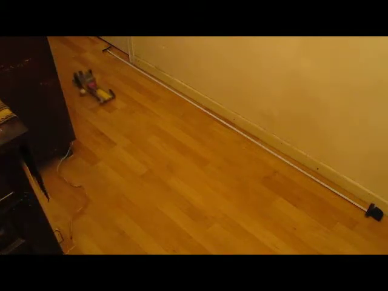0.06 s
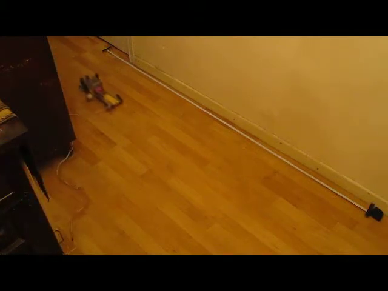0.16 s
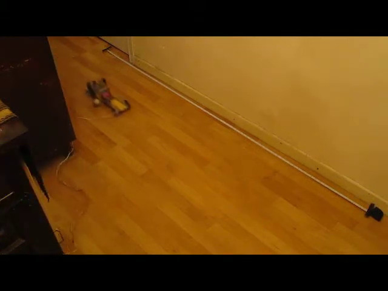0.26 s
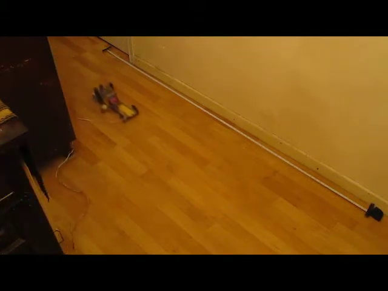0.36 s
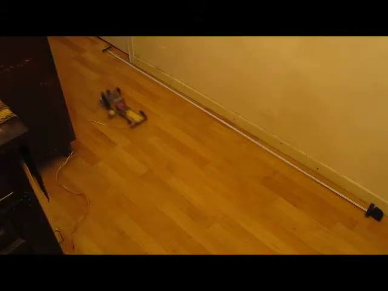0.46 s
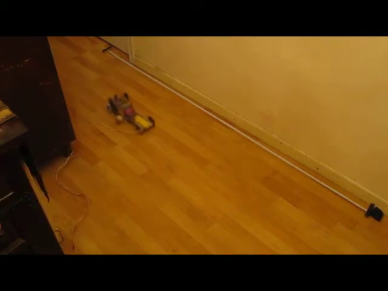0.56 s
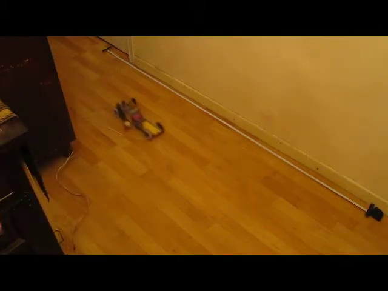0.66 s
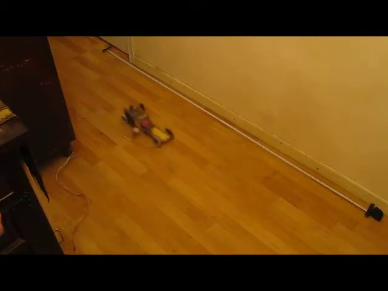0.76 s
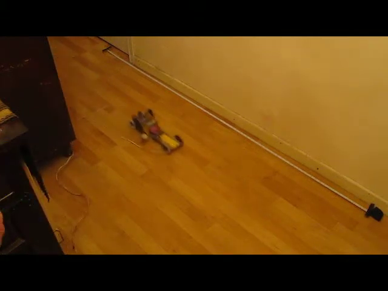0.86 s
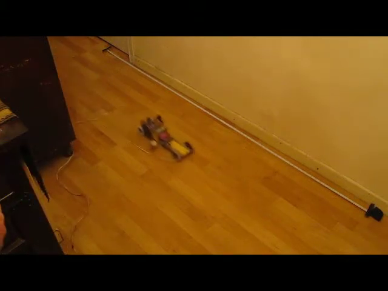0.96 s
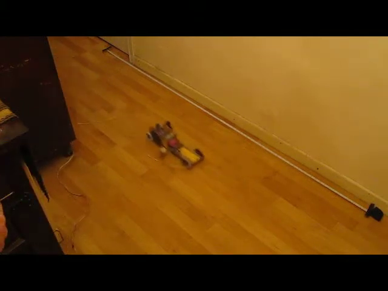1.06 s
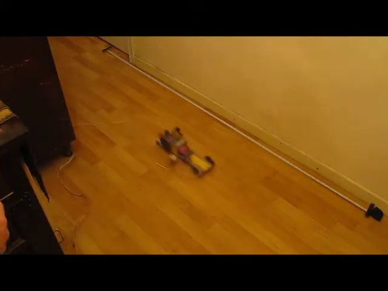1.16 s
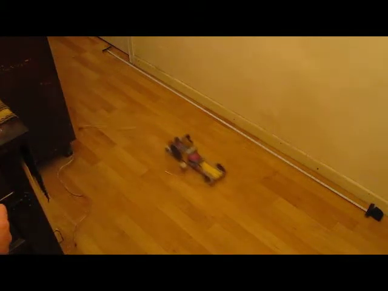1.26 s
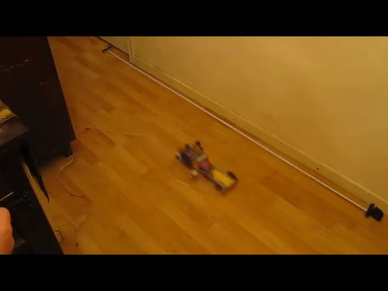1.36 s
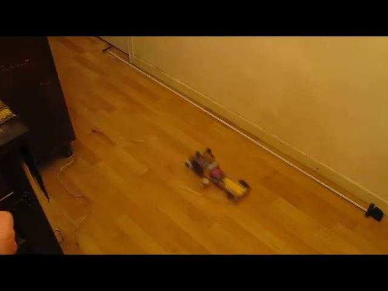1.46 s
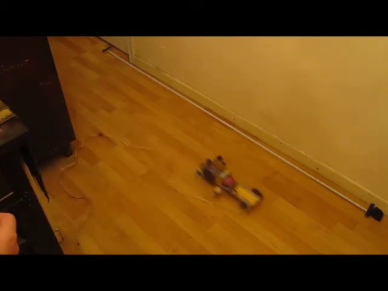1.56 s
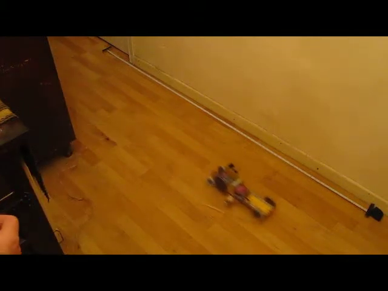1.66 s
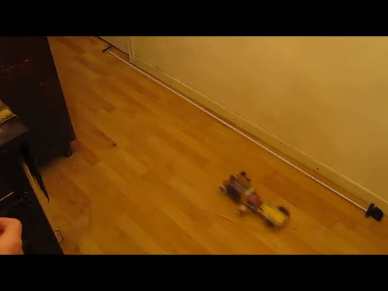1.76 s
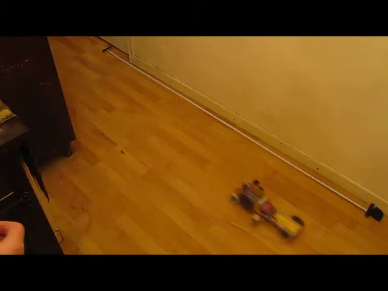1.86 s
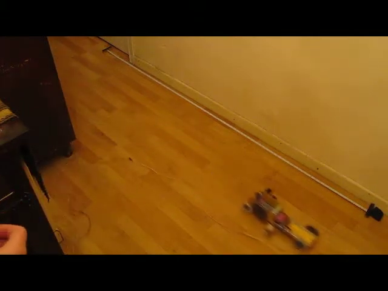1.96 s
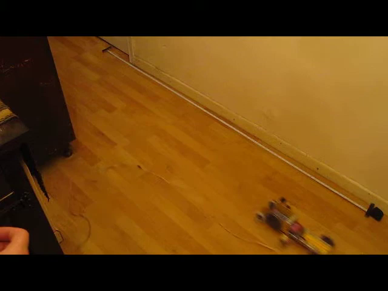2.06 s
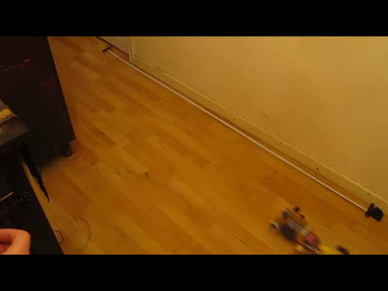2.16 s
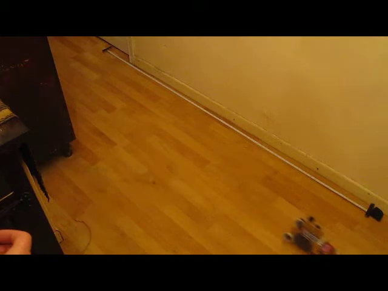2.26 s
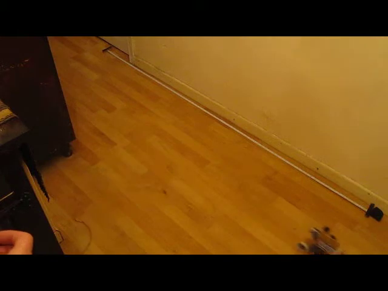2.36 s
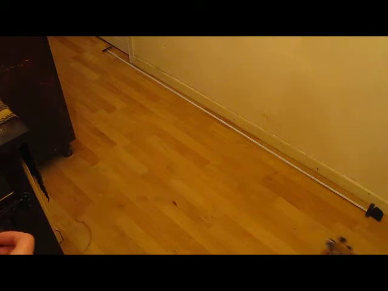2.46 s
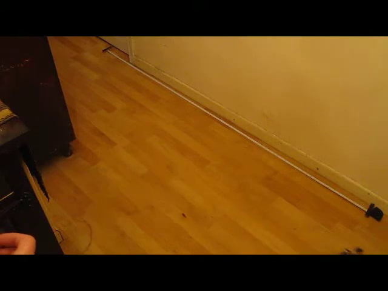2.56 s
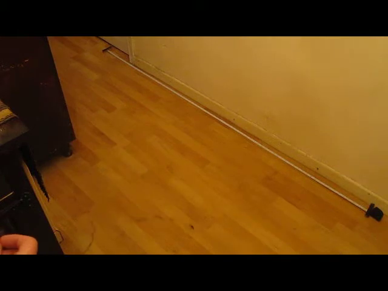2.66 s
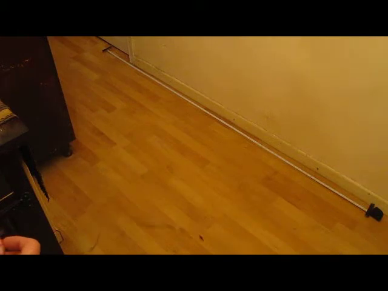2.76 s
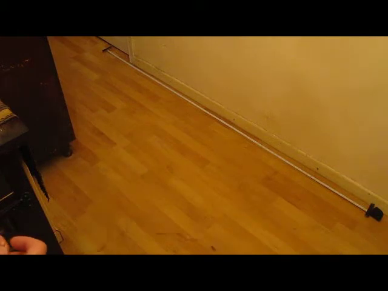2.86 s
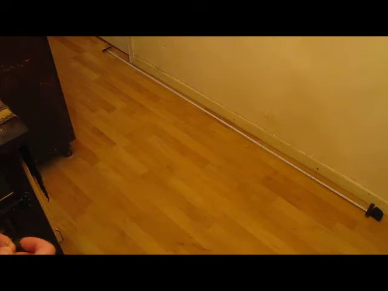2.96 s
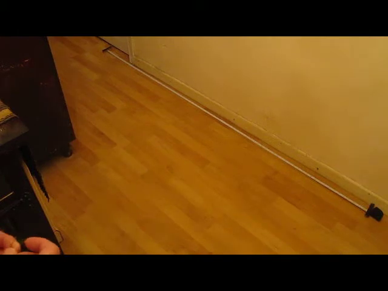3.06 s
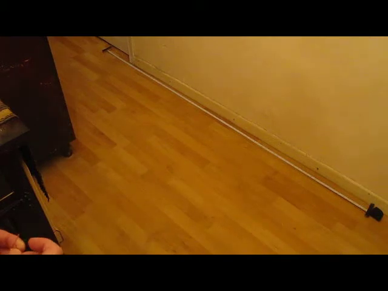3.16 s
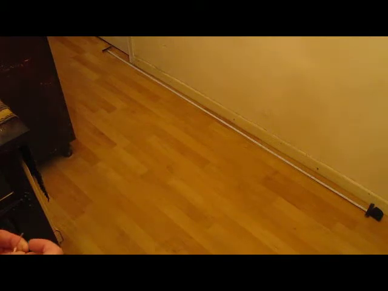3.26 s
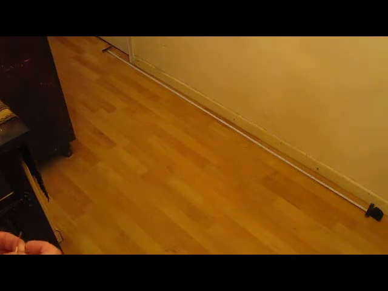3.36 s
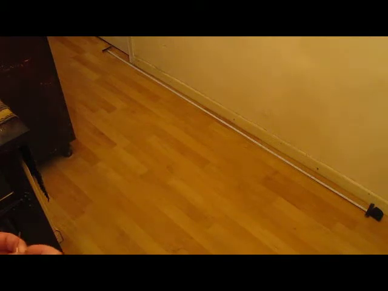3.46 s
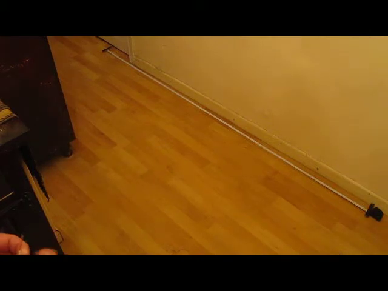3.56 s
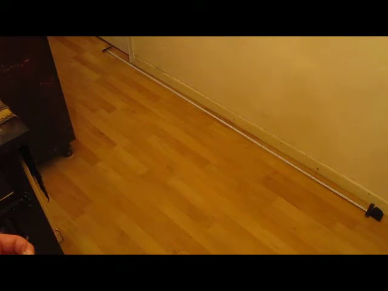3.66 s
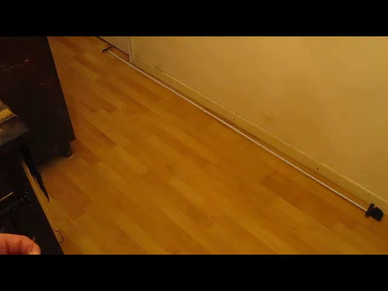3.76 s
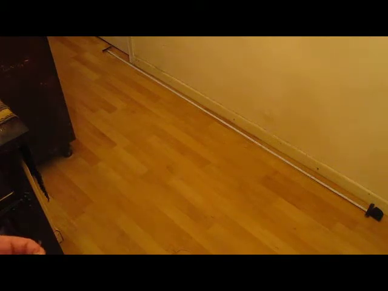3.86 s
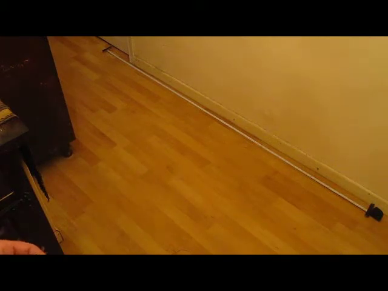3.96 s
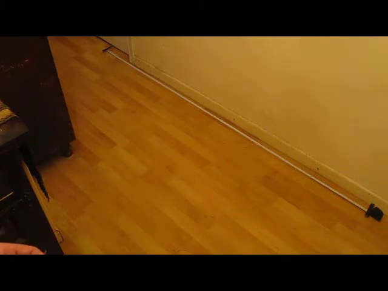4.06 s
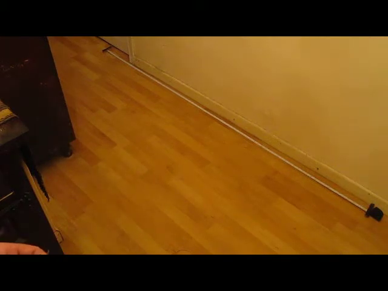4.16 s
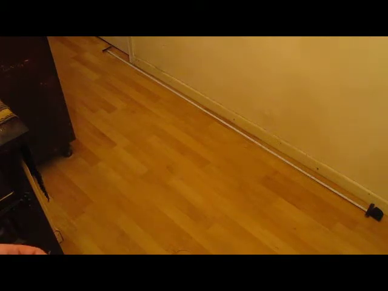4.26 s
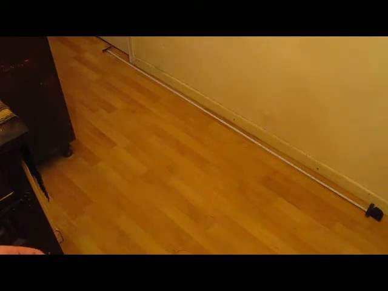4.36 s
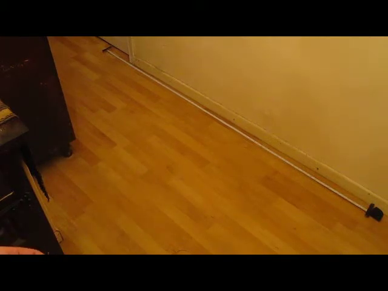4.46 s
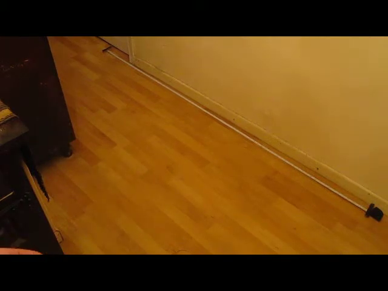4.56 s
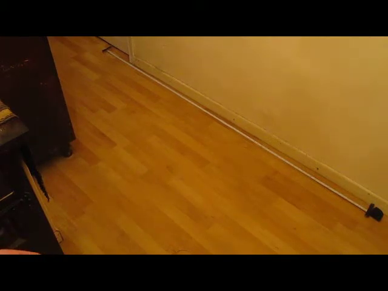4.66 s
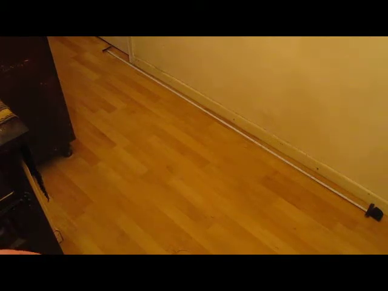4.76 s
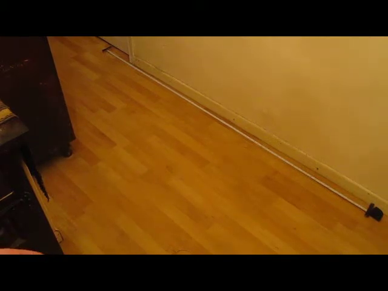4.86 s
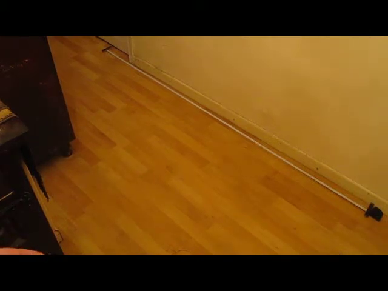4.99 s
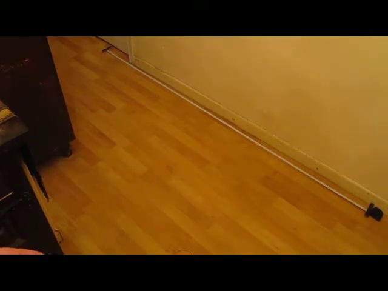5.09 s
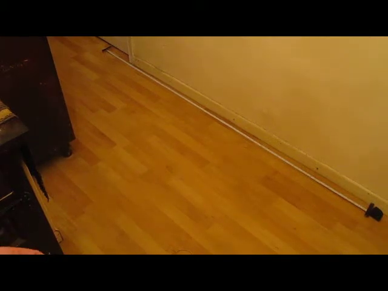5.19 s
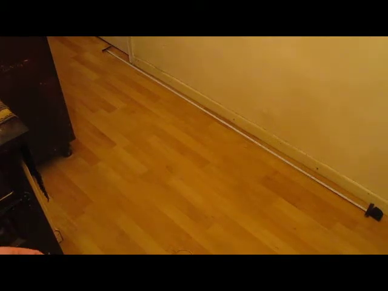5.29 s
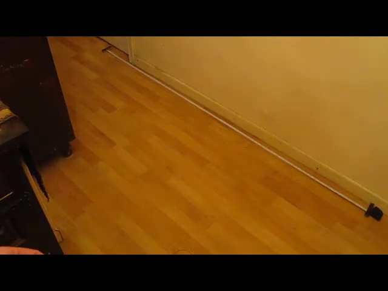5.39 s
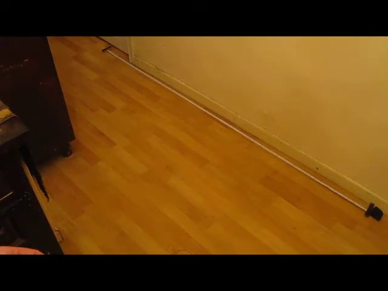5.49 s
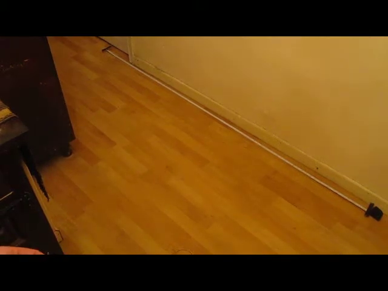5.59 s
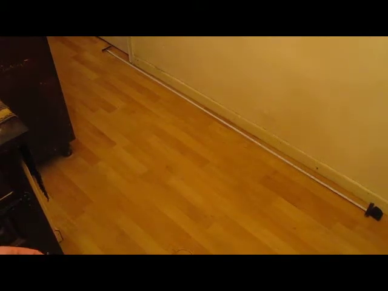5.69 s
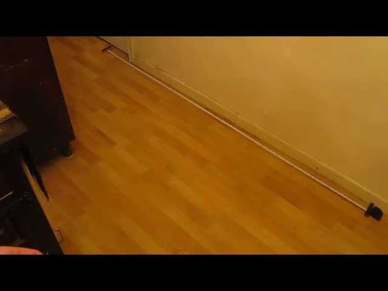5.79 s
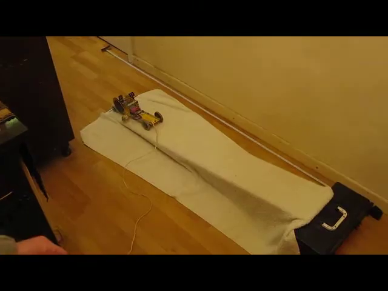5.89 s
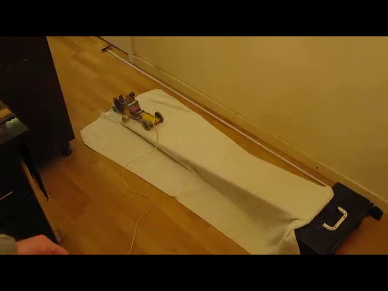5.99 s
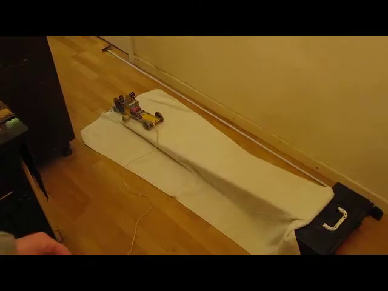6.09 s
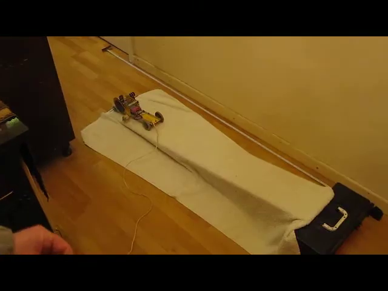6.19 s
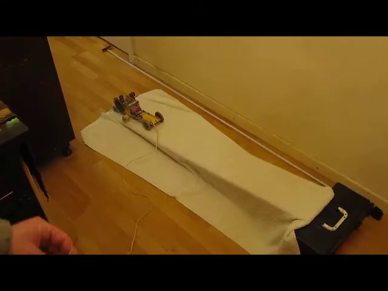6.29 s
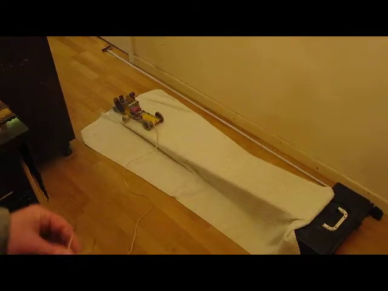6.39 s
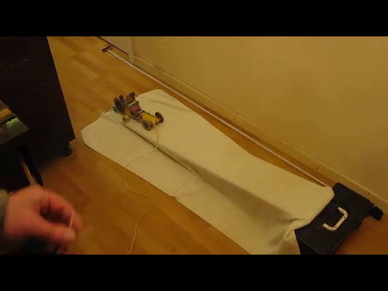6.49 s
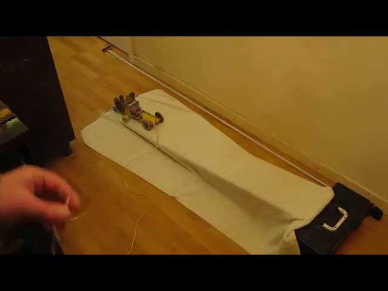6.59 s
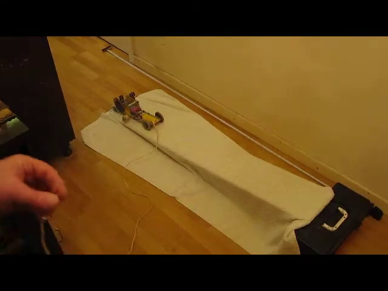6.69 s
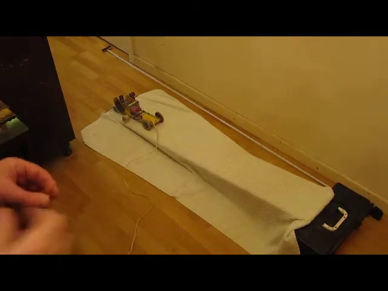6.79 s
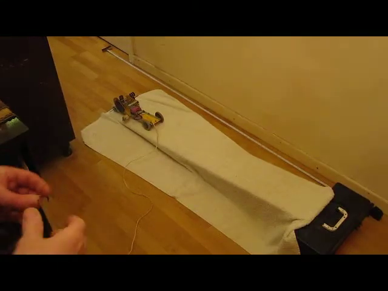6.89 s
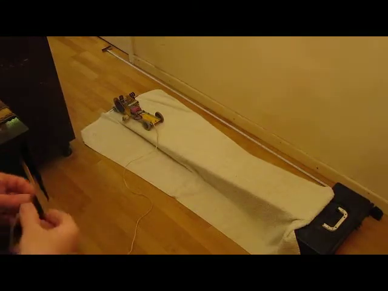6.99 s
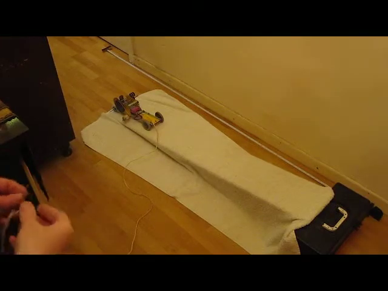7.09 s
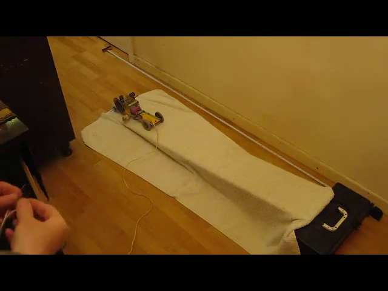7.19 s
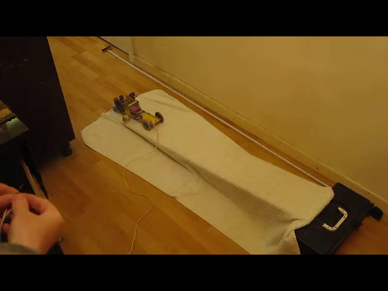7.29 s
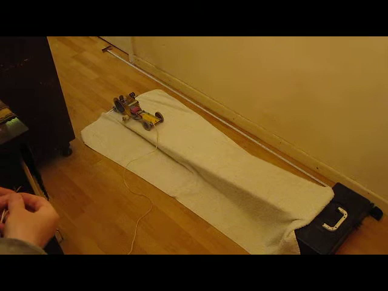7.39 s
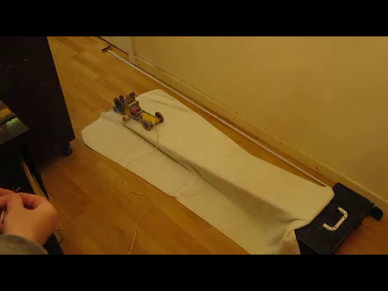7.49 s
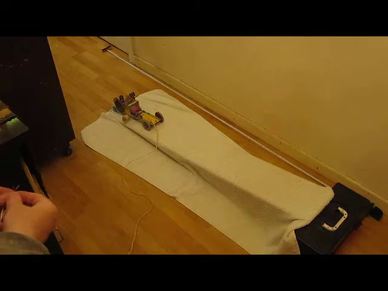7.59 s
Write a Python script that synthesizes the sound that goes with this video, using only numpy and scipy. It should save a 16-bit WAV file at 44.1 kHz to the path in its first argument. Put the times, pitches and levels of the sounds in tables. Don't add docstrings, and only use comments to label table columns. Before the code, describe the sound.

In a bare room, a small motorised plastic car rattles over floorboards, its gear chatter pulsing about eleven times a second, a hard beat then a softer one. After three seconds it jams with a shrill squeal and a short reverberant tail. Close to the microphone, wire ticks and rubs, then plastic is knocked sharply. A brief total silence interrupts the camera hiss before softer taps and cloth rubbing.

```python
import sys
import numpy as np
from scipy import signal
from scipy.io import wavfile
from scipy.ndimage import uniform_filter1d

SR = 44100
rng = np.random.default_rng(int(sys.argv[2]) if len(sys.argv) > 2 else 0)


def pcm_store(signal):
    levels = np.round(np.clip(np.atleast_2d(signal), -1, 1) * 32767)
    wavfile.write(sys.argv[1], SR, levels.astype(np.int16).T)


def makeup_ratio(level_db):
    decades = np.asarray(level_db, float) / 20
    return 10 ** decades


N = 336924
T = np.arange(N) / SR
CAR_N = 150000
TURN_HZ = 5.515


def evened(x):
    return x / np.sqrt(np.mean(x ** 2) + 1e-20)


def read(points, hz):
    f, value = np.transpose(points)
    return np.interp(np.log(hz + 1), np.log(f + 1), value)


def add(mix, s, sound):
    part = mix[round(s * SR):][:len(sound)]
    part += sound[:len(part)]


def drift(hz, count):
    return evened(np.interp(T[:count] * hz, np.arange(2000), rng.standard_normal(2000)))


def resonate(x, hz, width):
    turn = np.exp(2j * np.pi * np.cumsum(hz * np.ones(len(x))) / SR)
    r = np.exp(-np.pi * width / SR)
    return 2 * (turn * signal.lfilter([1 - r], [1, -r], x / turn + 1e-18)).real


def noise(shape, patchy_db, grain_db=0.0, count=N, size=512):
    x = rng.standard_normal(count) * makeup_ratio(grain_db * np.minimum(rng.exponential(1, count), 6))
    hz, _, z = signal.stft(x, SR, nperseg=size, noverlap=size * 3 // 4)
    patches = uniform_filter1d(rng.standard_normal(z.shape), size=5, axis=0)
    patches = evened(uniform_filter1d(patches, size=12, axis=1))
    z = z * makeup_ratio(read(shape, hz)[:, None] + patchy_db * patches)
    return evened(signal.istft(z, SR, nperseg=size, noverlap=size * 3 // 4)[1][:count])


def camera():
    # (frequency [Hz], density [dB per Hz])
    hiss_shape = [(15, -35), (25, -9), (332, -10), (503, -13), (668, -8), (912, -11.5), (1090, -8),
                  (1530, -14), (1880, -9), (2630, -18.5), (3160, -14), (4090, -19.5), (8660, -27),
                  (10600, -28.5), (12100, -46), (15800, -79.5), (22000, -120)]
    # (frequency [Hz], level [dB])
    drive_tones = [(667.5, -61), (1120, -61), (1238, -68), (1292, -68.5), (1351, -82), (1863, -65),
                   (1895, -52), (2153, -69.5), (2180, -61.5), (2439, -63), (2471, -68), (3235, -63.5),
                   (3521, -69), (4565, -63), (5577, -70.5), (6121, -75), (8468, -70.5), (9679, -75)]
    drum = 2 * np.pi * 30.1 * T
    out = makeup_ratio(-47) * noise(hiss_shape, patchy_db=-0.6, size=2048)
    casing_hz, casing_width = 1140, 190
    puffs = (1 + .45 * np.cos(2 * drum)) * rng.standard_normal(N)
    whir = resonate(resonate(puffs, casing_hz, casing_width), casing_hz, 2 * casing_width)
    out += makeup_ratio(-46.5) * evened(whir)
    throb = np.sqrt(2) * (1 + 0.1 * np.cos(drum))
    for hz, db in drive_tones:
        out += makeup_ratio(db) * throb * np.sin(2 * np.pi * hz * T + 1.26 * drift(30, N))
    return out


def room(x):
    # (frequency [Hz], t60 [s])
    decay = [(150, .45), (600, .46), (1200, .48), (2700, .43), (6000, .45), (11000, .32)]
    out, at = np.zeros(N), np.arange(300, SR // 2, 20)
    for k in range(3):
        taps = np.zeros(SR // 2 + 20)
        taps[at + rng.integers(0, 20, len(at))] = rng.choice([-1., 1.], len(at))
        hz, t, z = signal.stft(taps, SR, nperseg=256)
        tail = signal.istft(z * makeup_ratio(-60 * t / read(decay, hz)[:, None]), SR, nperseg=256)[1]
        share = np.sqrt(2 / 3) * np.cos(2 * np.pi * (1.301 * T[:len(x)] + k / 3))
        add(out, 0, signal.oaconvolve(x * share, tail / np.linalg.norm(tail)))
    return out


def modes(table, t, centre_hz, slope_db):
    return sum(makeup_ratio(db - slope_db * abs(np.log2(hz / centre_hz)) - 60 * t / t60) * np.sin(2 * np.pi * hz * t)
               for hz, db, t60 in table)


def knocks():
    # (time [s], peak [dB], centre of the blow [Hz], low ring [dB re peak], high ring [dB re peak])
    blows = [
        (5.549, 9.5, 1330, -43, -31),
        (5.894, -2.5, 730, -22, -25),
        (5.927, -2.5, 735, -26, -24),
        (5.977, -4, 1280, -36, -25.5),
        (6.233, -19.5, 510, -25, -21),
        (6.452, -18, 520, -36, -27),
    ]
    # (frequency [Hz], level [dB], t60 [s])
    shell_modes = [(520, -15.5, 0.036), (760, -1, 0.026), (1070, -2, 0.026), (1263, 6, 0.017),
                   (2250, 0.5, 0.012), (3200, -7, 0.0059), (4460, -5.5, 0.027)]
    # (frequency [Hz], t60 [s])
    shell_rings = [(268, .16), (853, .21)]
    out, t = np.zeros(N), T[:SR // 5]
    for s, db, hz, *rings_db in blows:
        body = modes(shell_modes, t, hz, slope_db=10.5)
        snap_db = max(-14 + 1.21 * db, -23)
        snap = evened(resonate(rng.standard_normal(len(t)), 3000, 5000)) * makeup_ratio(snap_db - 60 * t / 0.0081)
        ringing = [(f, ring_db - 4.5, t60) for (f, t60), ring_db in zip(shell_rings, rings_db)]
        ring = modes(ringing, t, hz, slope_db=-2.5)
        knock = body / abs(body).max() + 0.43 * snap + ring
        add(out, s + .0006, makeup_ratio(db) * knock * (1 - np.exp(-t / 0.0006)))
    return signal.sosfilt(signal.butter(3, 230, "high", fs=SR, output="sos"), out)


def ticks():
    # (time [s], peak [dB], frequency [Hz], t60 [s], width [share of frequency])
    dry_ticks = [(3.712, -36, 3360, 0.012, 0.8), (3.7264, -36, 4580, 0.012, 1),
                 (3.764, -28.5, 3200, 0.013, 0.94), (3.7744, -37, 4580, 0.011, 1),
                 (4.9064, -33, 3730, 0.01, 0.8), (4.9751, -39, 4020, 0.012, 0.8),
                 (4.9992, -27.5, 3260, 0.01, 0.8), (5.311, -25.5, 7800, 0.007, 0.5),
                 (5.3193, -34, 3300, 0.014, 0.87), (5.3324, -35.5, 4570, 0.013, 0.99),
                 (5.9713, -31, 3000, 0.012, 0.8), (6.0066, -27, 3460, 0.012, 0.8),
                 (6.051, -31, 3050, 0.012, 0.89)]
    # (time [s], peak [dB], frequency [Hz], t60 [s], width [share of frequency])
    dull_snaps = [(4.7822, -15, 1250, .025, .3), (4.7822, -16, 2700, .015, .6), (4.797, -24, 1450, .05, .3),
                  (4.886, -24, 1300, .04, .6), (4.919, -21, 1300, .06, .25), (4.92, -23, 3800, .06, .2),
                  (4.92, -27, 2300, .05, .2), (5.981, -27, 3000, .05, .2), (5.866, -38, 180, .12, .6),
                  (3.765, -33, 7500, .02, .4), (3.727, -37, 9000, .02, .4), (6.238, -31, 480, .15, .7),
                  (6.458, -34, 520, .13, .8), (4.92, -39, 265, .12, .2)]
    out, t = np.zeros(N), T[:4000]
    for s, db, hz, t60, share in dry_ticks + dull_snaps:
        snap = resonate(resonate(rng.standard_normal(4000), hz, share * hz), hz, 0.69 * share * hz)
        snap = snap * makeup_ratio(-60 * t / t60) * (1 - np.exp(-30 * t / t60))
        add(out, s, makeup_ratio(db) * snap / abs(snap).max())
    return out


def rubbing():
    # (start [s], peak [s], end [s], dull rub [dB], bright hiss [dB])
    strokes = [(3.7, 3.716, 3.75, -50, -46), (3.75, 3.756, 4.05, -50, -52),
               (4.51, 4.552, 4.615, -50, -40.5), (4.62, 4.685, 4.79, -45, -40),
               (4.73, 4.782, 4.822, -38, -34.5), (4.864, 4.89, 4.905, -33, -35.5),
               (4.91, 4.924, 4.975, -33, -32), (4.94, 4.98, 4.9, -52, -49), (5.036, 5.08, 5.12, -60, -46),
               (5.108, 5.17, 5.4, -62, -46), (5.58, 5.67, 5.9, -62, -53), (5.976, 5.98, 6.005, -32, -34.5),
               (5.98, 6.018, 6.06, -50, -41.5), (6.041, 6.055, 6.07, -37, -37.5),
               (6.21, 6.303, 6.8, -44, -64), (6.33, 6.45, 6.58, -41.5, -50),
               (7.04, 7.15, 7.34, -39.5, -49.5), (6.52, 6.64, 6.8, -42.5, -62),
               (7.2, 7.33, 7.5, -56, -55.5)]
    # (frequency [Hz], density [dB per Hz])
    dull_shape = [(150, -58), (250, -8.5), (298, -6), (446, -12.5), (874, 0.5), (1120, -3), (1930, -6.5),
                  (2560, -18), (2780, -11), (4200, -30), (5460, -63), (9240, -120)]
    # (frequency [Hz], density [dB per Hz])
    bright_shape = [(1180, -41), (2000, -2), (4060, -5), (4350, -7.5), (5130, -9), (9100, -16),
                    (10500, -18), (12100, -42), (15800, -64), (22000, -120)]
    rub = noise(dull_shape, patchy_db=3.0, grain_db=1.5)
    hiss = noise(bright_shape, patchy_db=2.3, grain_db=3.0)
    rub_power, hiss_power = np.zeros((2, N))
    for start, peak, end, rub_db, hiss_db in strokes:
        t = T[:round((end - start) * SR)]
        edges = np.clip(np.minimum(t, t[-1] - t) / 0.0045, 0, 1)
        from_peak = np.interp(t, [0, peak - start, end - start], [1, 0, 1])
        swell = edges * makeup_ratio(-16 * from_peak ** 1.43)
        add(rub_power, start, (makeup_ratio(rub_db) * swell) ** 2)
        add(hiss_power, start, (makeup_ratio(hiss_db) * swell) ** 2)
    return np.sqrt(rub_power) * rub + np.sqrt(hiss_power) * hiss


def sleeve():
    out, start, end = np.zeros(N), 7.15, 7.5
    count = round((end - start) * SR)
    whistle = evened(resonate(rng.standard_normal(count), 4720, 220))
    add(out, start, makeup_ratio(-56) * np.hanning(count) * whistle)
    return out


def hands():
    return knocks() + ticks() + rubbing() + sleeve()


def hum():
    # (time [s], level [dB])
    path_db = [(0.0, -59), (0.22, -47), (0.72, -45.5), (1.1, -49.5), (1.34, -52), (1.45, -46), (1.8, -47),
               (2.14, -43), (2.26, -59.5), (2.46, -42), (2.56, -53.5), (3.15, -55), (3.25, -61)]
    shaft = 2 * np.pi * np.cumsum(129 * (1 + .01 * drift(8, N))) / SR
    beat_db = 2.5 * np.cos(2 * np.pi * (TURN_HZ * T - .76)) + 1.5 * np.cos(4 * np.pi * (TURN_HZ * T - .3))
    hum_db = np.interp(T, *np.transpose(path_db), right=-120) + beat_db + 1.5 * drift(14, N)
    return makeup_ratio(hum_db) * np.sqrt(2) * np.sin(shaft)


def bursts(s, db, t60, rise):
    power, late = np.zeros(CAR_N), np.maximum(s, 0)
    np.add.at(power, (late * SR).astype(int), makeup_ratio(db - 60 * (late - s) / t60) ** 2)
    t = T[:SR // 4]
    fade = makeup_ratio(-120 * t / t60) * (1 - np.exp(-t / rise))
    return np.sqrt(abs(signal.oaconvolve(power, fade)[:CAR_N]))


def wheels(effort_db, load_db):
    # (frequency [Hz], density [dB per Hz])
    rumble_shape = [(18, -56), (30, -13), (96, -27.5), (129, -18), (215, -17.5), (526, 0), (735, -3),
                    (876, 0), (1200, -3), (1800, -12.5), (2000, -19), (2600, -21), (4400, -120)]
    roll = noise(rumble_shape, patchy_db=2.0, grain_db=3.0, count=CAR_N, size=1024)
    roll = evened(roll + 0.4 * resonate(roll, 510, 160))
    rumble_db = -23.5 - 0.37 * (T[:CAR_N] - 1.5) + effort_db
    return makeup_ratio(rumble_db + 1.08 * load_db + 1.88 * drift(90, CAR_N)) * roll


def gears(effort_db, load_db, tight, chatter):
    # (frequency [Hz], density [dB per Hz])
    rattle_shape = [(760, -27.5), (1300, -8.5), (1800, -11.5), (2150, -4), (4100, -3.5), (4590, 0),
                    (5280, -5.5), (6070, -1.5), (6480, -0.5), (7250, -4), (9960, -7.5), (11100, -14),
                    (12100, -33.5), (15800, -68), (22000, -120)]
    t = T[:CAR_N]
    growl_db = -16.5 - 0.98 * t + 1.2 * effort_db
    clatter_db = -24.5 + 0.35 * t + 0.97 * effort_db
    rattle = chatter * noise(rattle_shape, patchy_db=1.0, grain_db=3.0, count=CAR_N)
    bright = signal.sosfiltfilt(signal.butter(2, 4200, "high", fs=SR, output="sos"), rattle)
    clatter = bright * makeup_ratio(clatter_db) * (.5 + 1.15 * tight)
    return clatter + (rattle - bright) * makeup_ratio(growl_db + 0.85 * load_db)


def chassis(s, hard_db, soft_db, lean, tight, chatter):
    # (frequency [Hz], width [Hz], level [dB])
    resonances = [(2161, 120, -9), (4620, 240, -9.5), (6012, 170, -6), (7190, 530, -4.5)]
    # (hard bind [dB], soft bind [dB], lag [s], tilt [dB per unit of lean])
    answers = [(-20, -22.5, 0.001, 11), (-13, -17.5, 0.001, 2.5), (-12, -19, 0.014, -1.5),
               (-17.5, -17.5, 0.0052, -3)]
    out = np.zeros(CAR_N)
    for (hz, width, db), (hard, soft, lag, lean_db) in zip(resonances, answers):
        odd_db = 1.5 * rng.standard_normal(len(s))
        ring_db = np.r_[hard_db + hard, soft_db + soft] + lean_db * np.r_[lean, lean] + odd_db
        glide_hz = hz * (1 + .015 * (tight - 1) + .012 * drift(30, CAR_N))
        ring = resonate(resonate(rng.standard_normal(CAR_N), glide_hz, width), glide_hz, 2 * width)
        swell = bursts(s + lag, ring_db, t60=0.16, rise=0.004) + makeup_ratio(-31.5)
        out += makeup_ratio(db) * chatter * evened(ring) * swell
    return out


def squeals():
    # (start [s], end [s], from [Hz], to [Hz])
    glides = [(3.148, 3.27, 6270, 6000), (3.22, 3.335, 6050, 6110), (3.11, 3.19, 4800, 4770),
              (3.145, 3.195, 8680, 8650), (3.16, 3.2, 9700, 9750), (3.18, 3.33, 10000, 9950),
              (3.27, 3.318, 2760, 2740), (3.16, 3.2, 7600, 7600), (3.27, 3.33, 7650, 7580),
              (3.19, 3.33, 12200, 12120), (3.02, 3.08, 2450, 2430), (3.19, 3.27, 2200, 2150)]
    glides_db = [-17.5, -21, -28, -29, -32, -36, -23, -31.5, -29.5, -57, -29.5, -36]
    out = np.zeros(CAR_N)
    for (start, end, hz0, hz1), db in zip(glides, glides_db):
        count = round((end - start) * SR)
        hz = np.linspace(hz0, hz1, count) * (1 + 0.0045 * drift(129.6, count))
        tone = np.sqrt(2) * np.sin(2 * np.pi * np.cumsum(hz) / SR)
        fuzz = evened(resonate(rng.standard_normal(count), hz, 120))
        slip = (.9 * tone + .4 * fuzz) * makeup_ratio(db + 3.5 * drift(130, count))
        add(out, start, slip * signal.windows.tukey(count, .5))
    return out


def car():
    # (time [s], level [dB])
    push = [
        (0.0, 1.5),
        (0.4, 0),
        (2.95, 0),
        (3.06, 0.5),
        (3.14, 2.5),
        (3.19, -3),
        (3.25, -7.5),
        (3.285, -1),
        (3.39, -6),
    ]
    # (times a turn [1], swell [dB], place [turn])
    load = [(1, 1.5, .72), (2, 1.2, .38)]
    # (time [s], hard bind [dB], soft bind [dB], lean to the low rings [-1..1])
    binds = [(-0.026, 1.5, -3, 0.3), (0.1545, 1, -2.5, -0.018), (0.3364, 1.5, 0.5, 0.021),
             (0.52, 0.5, -2, -0.34), (0.7028, 1, -2.5, 0.023), (0.879, 1, 0.5, 0.28),
             (1.062, -0.5, 2, -0.2), (1.242, -0.5, -2.5, 0.17), (1.426, 1.5, 0.5, -0.4),
             (1.6073, 2.5, 3.5, 0.43), (1.7825, 2.5, 1, 0.55), (1.965, 1, 0.5, 0.97), (2.143, 2, 3.5, 0.41),
             (2.3271, 1.5, 1.5, 0.18), (2.513, 3.5, -2.5, -0.6), (2.6964, 2.5, 0.5, -0.01),
             (2.875, 2.5, -5, 0.13), (3.053, -7.5, -19, -0.029)]
    t = T[:CAR_N]
    effort_db = np.interp(t, *np.transpose(push))
    load_db = sum(db * np.cos(2 * np.pi * k * (TURN_HZ * t - at)) for k, db, at in load)
    s, hard_db, soft_db, lean = np.transpose(binds)
    s = np.r_[s, s + 0.0972]
    tight = bursts(s, np.r_[hard_db + 3, soft_db - 2], t60=0.25, rise=.003)
    chatter = makeup_ratio(1.28 * drift(220, CAR_N))
    out = wheels(effort_db, load_db) + gears(effort_db, load_db, tight, chatter)
    out += chassis(s, hard_db, soft_db, lean, tight, chatter)
    out *= np.clip((push[-1][0] - t) / 0.033, 0, 1)
    return np.pad(out + squeals(), (0, N - CAR_N))


def scene():
    toy = car()
    return (0.94 * toy + room(0.52 * toy[:CAR_N]) + hum() + hands() + camera())[None]


def low_pass(x):
    return signal.sosfilt(signal.butter(12, 12270, fs=SR, output="sos"), x)


def record(dry):
    x = signal.oaconvolve(dry, signal.firwin(255, 12200, window=("kaiser", 5), fs=SR)[None], "same")
    power = uniform_filter1d(uniform_filter1d(x ** 2, size=900), size=900)
    power_db = 10 * np.log10(abs(power) + 1e-12)
    x = x / makeup_ratio(.35 * np.maximum(power_db + 18, 0))
    x = x / (1 + abs(x / .73) ** 4) ** .25
    mix = x * ((T < 5.7268) | (T > 5.8655))
    return low_pass(mix)


dry = scene()
out = record(dry)
pcm_store(out)
```